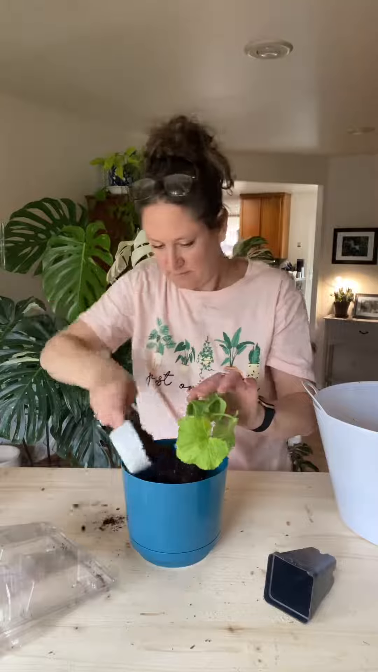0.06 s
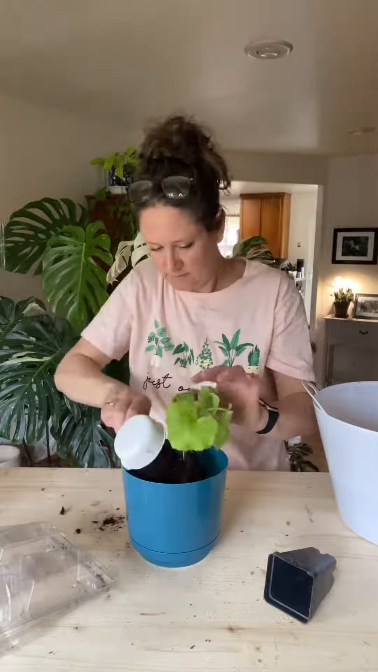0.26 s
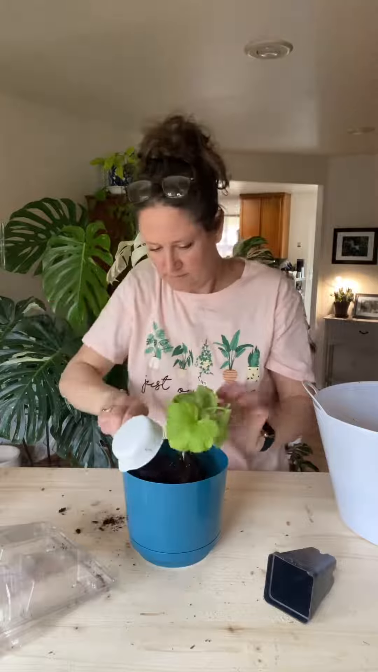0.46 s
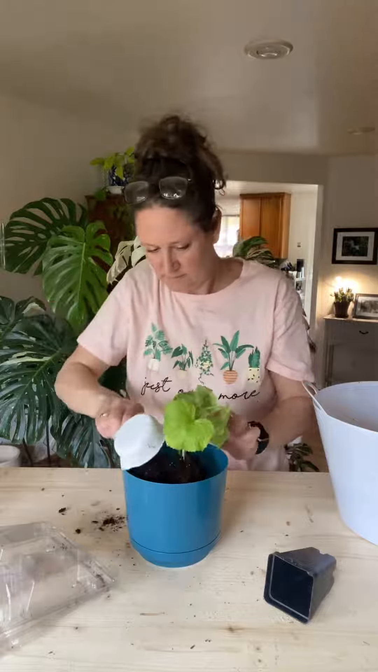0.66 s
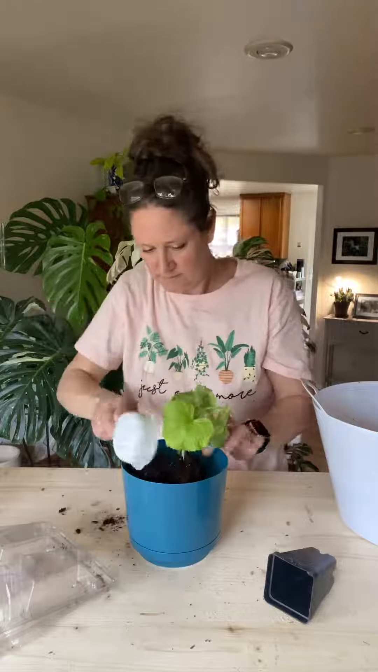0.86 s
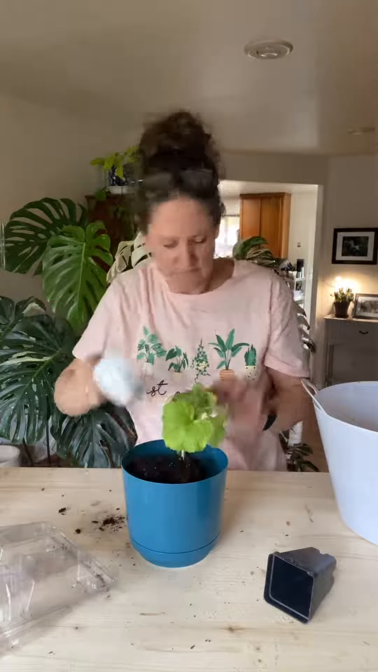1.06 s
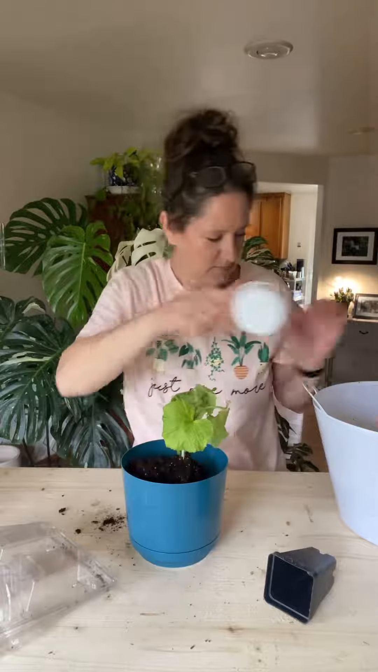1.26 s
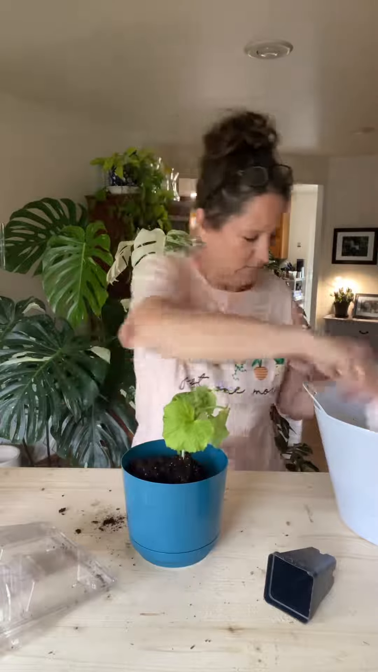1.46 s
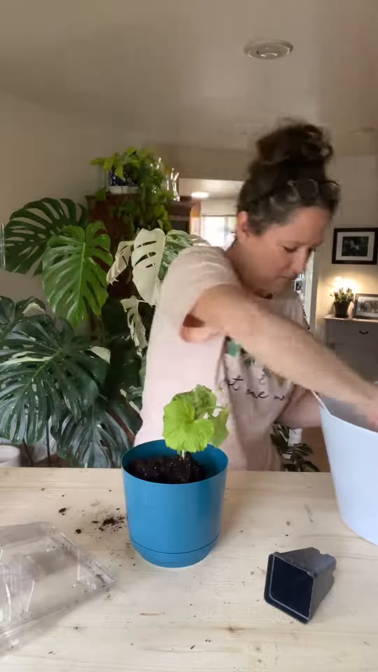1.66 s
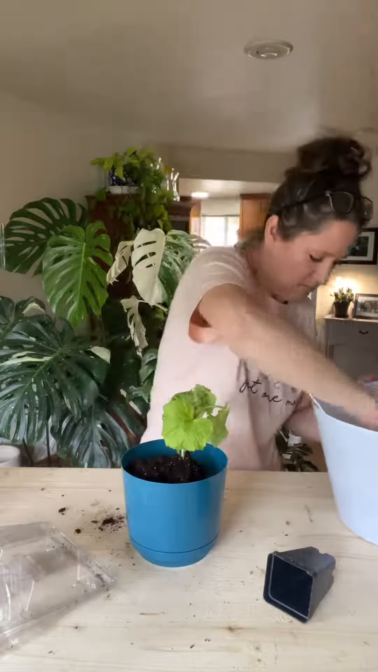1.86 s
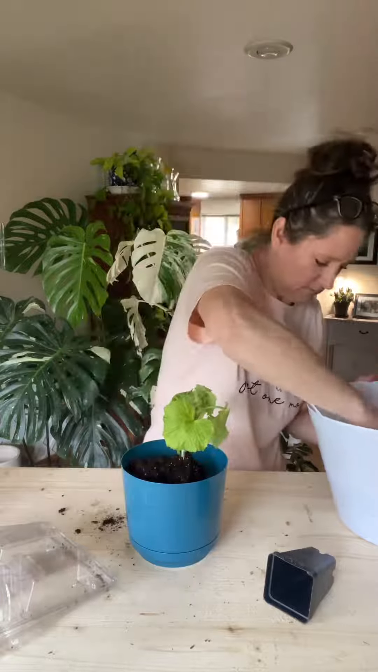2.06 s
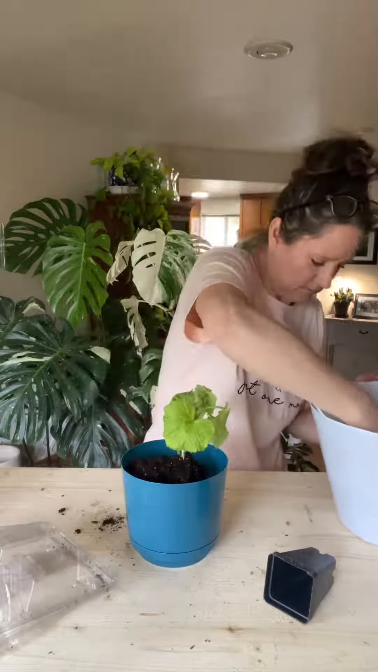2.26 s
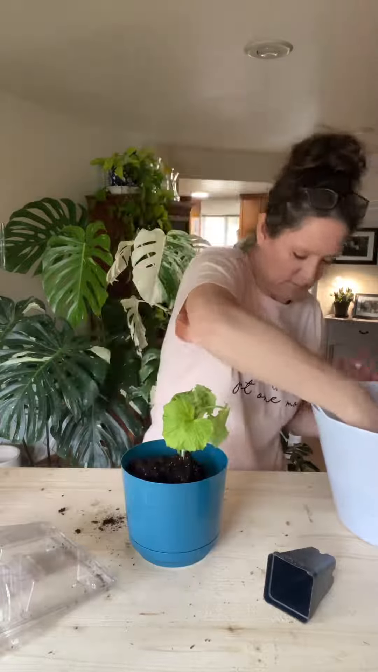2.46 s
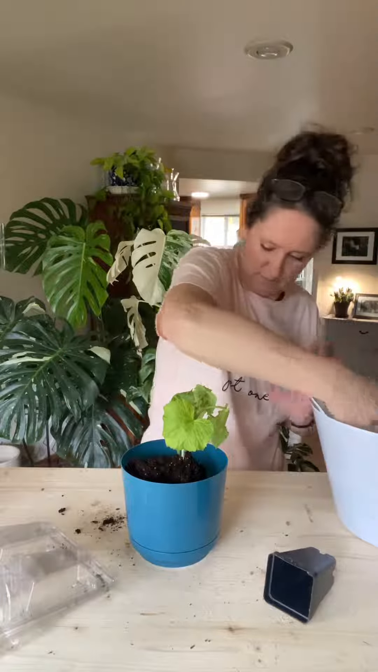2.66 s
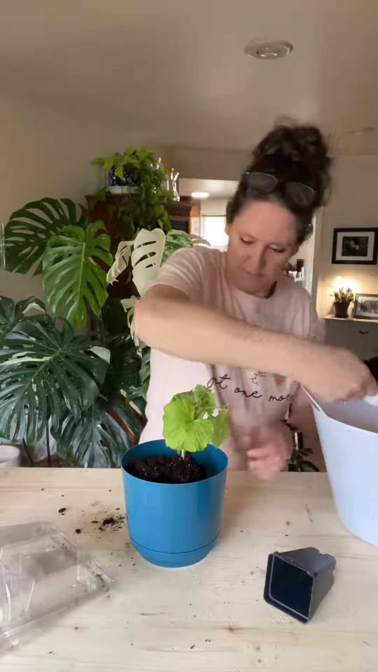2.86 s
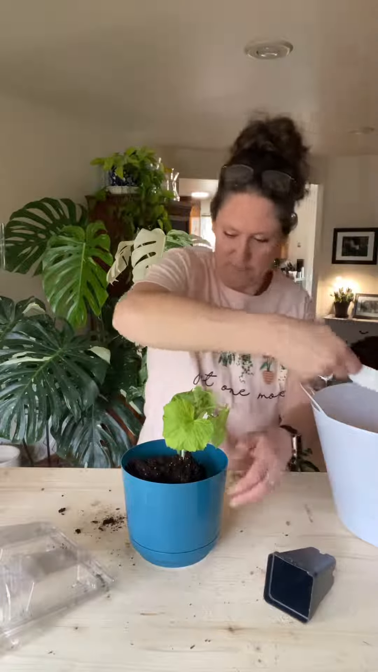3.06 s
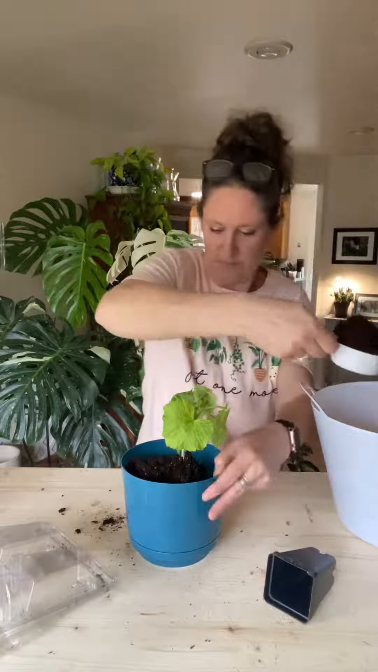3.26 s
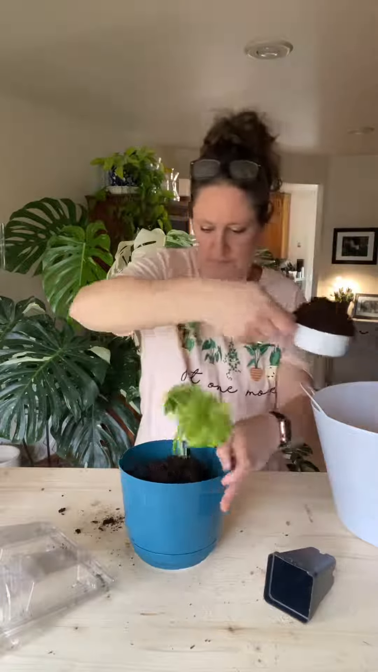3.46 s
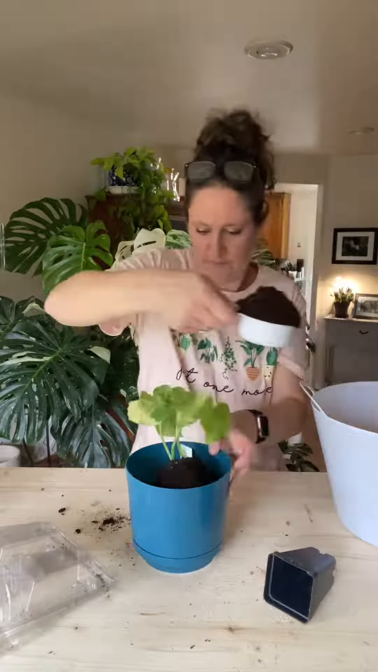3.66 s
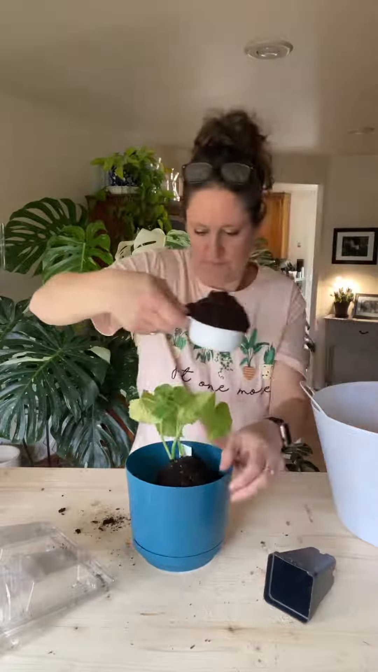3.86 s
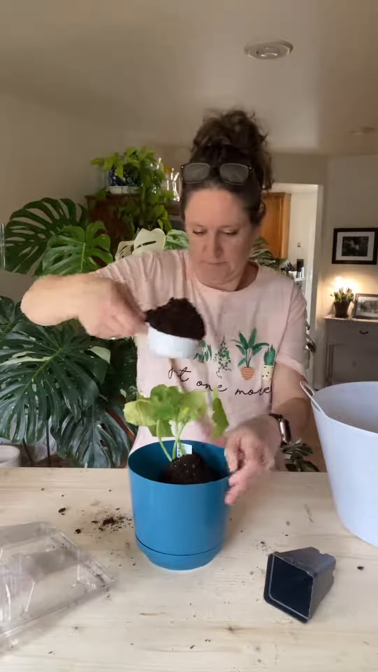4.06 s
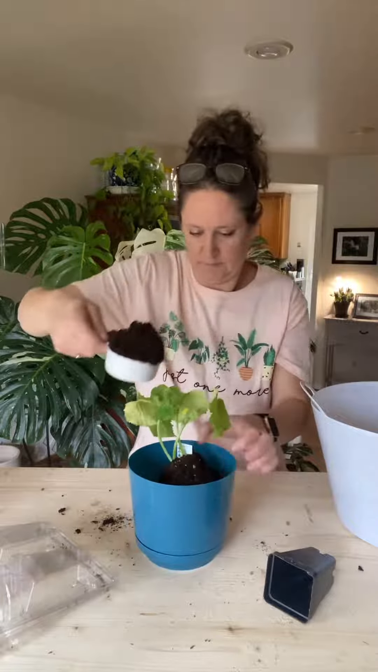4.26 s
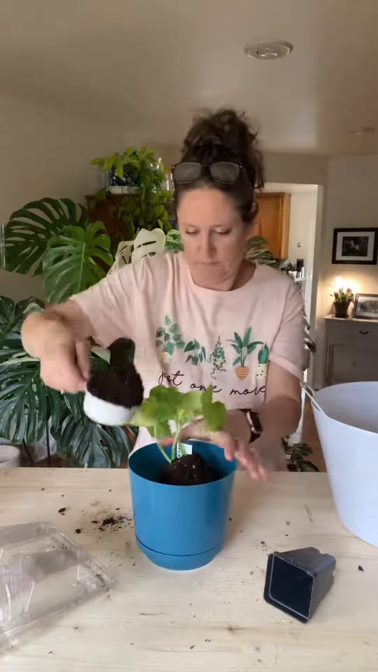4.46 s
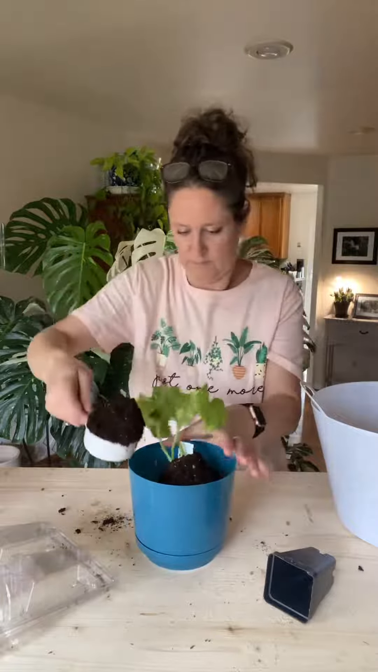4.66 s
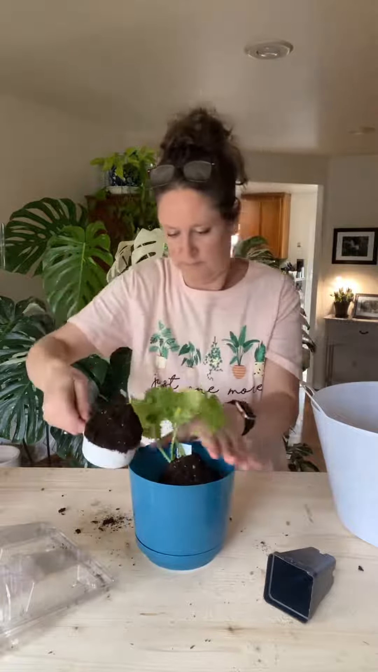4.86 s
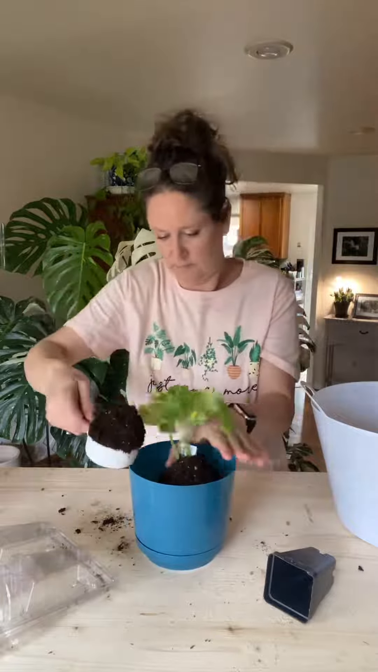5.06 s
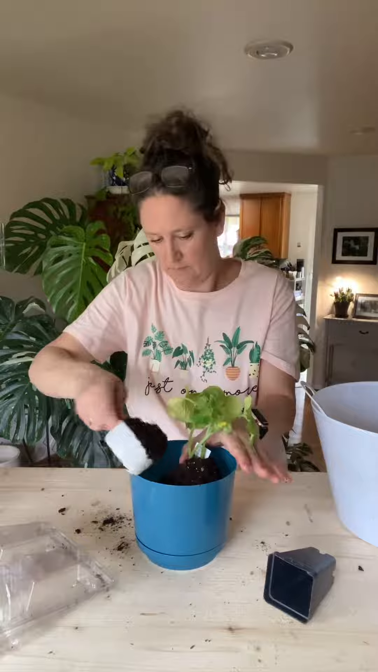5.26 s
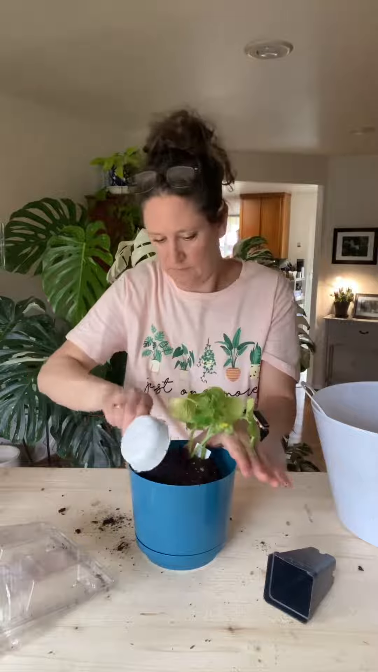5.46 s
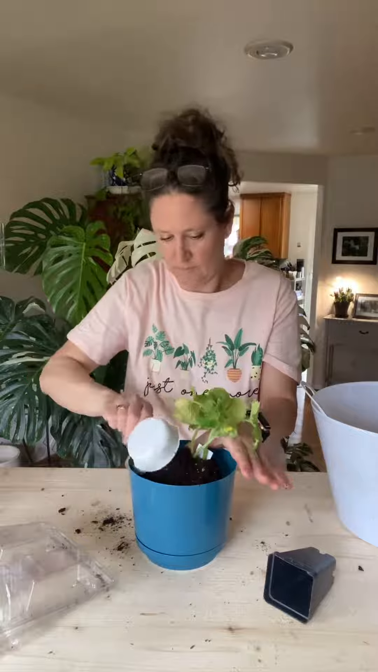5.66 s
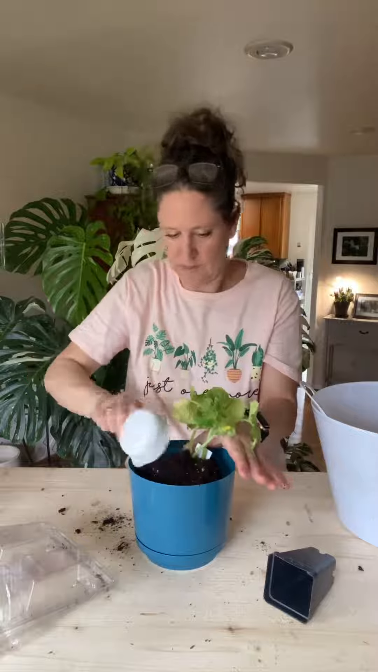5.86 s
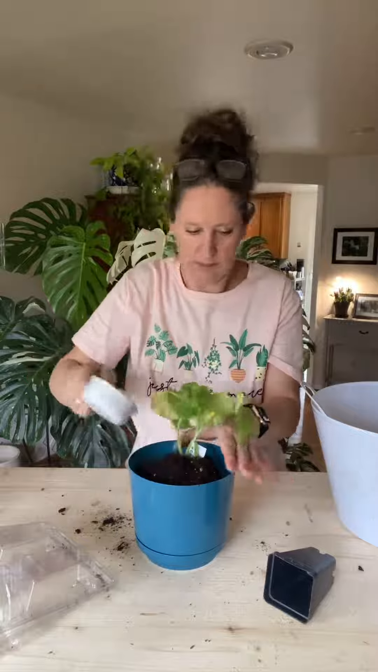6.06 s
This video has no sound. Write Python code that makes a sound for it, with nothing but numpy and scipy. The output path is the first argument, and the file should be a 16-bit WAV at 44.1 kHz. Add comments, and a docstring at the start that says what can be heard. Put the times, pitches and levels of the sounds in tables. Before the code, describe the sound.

Close plastic knocks and soft soil patter, a loud gritty scoop from a tub, then quieter scraping, tipping and light ticks indoors

```python
"""Potting soil scooped by cup

Close up, a small plastic cup digs into a tub of potting soil on a wooden table and tips it into a plastic pot.
Crumbs rub and patter as clusters of tiny random impacts; knocks on cup and rims are short bursts that ring
plastic resonances; each leaves a noise wash, the room's answer, and the table booms in low noise.
Behind them, in a quiet living room, lie a low appliance rumble and a faint hiss, both shaped noise."""
import sys
import numpy as np
from scipy import signal
from scipy.fft import rfft, irfft, next_fast_len
from scipy.io import wavfile
from scipy.ndimage import uniform_filter1d, map_coordinates

SR = 44100
rng = np.random.default_rng(int(sys.argv[2]) if len(sys.argv) > 2 else 0)


def wav_out(sig):
    """Save sig, one row per channel (or a flat mono array), as 16-bit PCM at SR to the path in sys.argv[1]."""
    wavfile.write(sys.argv[1], SR, np.round(np.clip(np.atleast_2d(sig).T, -1, 1) * 32767).astype(np.int16))


N = 269208


def soil():
    """Rubbing crumbs sound in the cup, scrape the tub, shake the walls and hiss; clumps break unevenly."""
    # soil sliding off the cup and falling free:
    # (start [s], rise [s], length [s], grit level [dB], sag [dB/s], dust re grit [dB])
    pours = [(.028, .012, 0.19, -37, 59, -8.5), (.22, .03, 0.19, -46, 25, -4.5),
             (.46, 0.038, 0.13, -46.5, 27, -9.5), (.57, 0.0089, 0.131, -53, 20, -10),
             (1.08, 0.0086, 0.16, -68.5, -14, 2.5), (3.64, 0.037, .17, -53, 47, 4.5),
             (4.06, 0.025, 0.082, -56.5, 36, 0), (4.79, 0.017, 0.19, -61, 7, -4.5),
             (4.92, 0.015, 0.21, -58, 22, -12), (5.04, 0.04, 0.22, -44.5, 78, -6.5),
             (5.55, 0.12, .35, -45.5, 59, -4), (6.0, 0.06, 0.24, -58.5, 11, -5)]
    # the cup dragged through soil: (start [s], rise [s], length [s], grit level [dB], sag [dB/s],
    # dust re grit [dB], walls re grit [dB], scrape re grit [dB])
    digs = [(.21, 0.011, 0.41, -58, -6.5, -14, 3, -15), (.74, 0.0087, 0.17, -46, 67, -3.5, 5.5, 3.5),
            (1.652, 0.0064, .17, -27.5, 70, -4.5, 3.5, -0.5), (1.8, 0.058, 0.26, -39.5, 20, -4, 8, 4.5),
            (2.07, 0.02, 0.39, -39.5, 35, -9, 0, 3.5), (2.43, .03, 0.13, -46, 26, -13, -8, -5),
            (2.57, 0.028, 0.079, -54, 13, -18.5, 2.5, 3), (2.69, 0.0067, 0.042, -52.5, 14, -16, -8, -6.5),
            (3.39, 0.038, 0.203, -47, -20, -7, -10, -3), (3.57, 0.015, 0.266, -41.5, 30, -6.5, 1.5, -1.5),
            (3.84, 0.0083, 0.11, -44, 77, -21, -3, -15), (3.98, 0.01, 0.25, -44, 40, -11, 1.5, -12.5),
            (4.56, 0.019, 0.071, -58.5, 5, -2.5, -10, -9), (4.63, 0.027, 0.064, -54, 23, -5.5, 3.5, -2),
            (5.36, 0.01, 0.1, -58.5, 41, -4, 17, 1)]
    # grit falling free: (frequency [Hz], relative level [dB])
    free_spectrum = [(710, -57), (1200, -19), (1860, -2), (2320, 6), (3430, 3.5), (6000, -14), (7800, -20),
                     (13200, -120)]
    # grit muffled inside the tub: (frequency [Hz], relative level [dB])
    muffled_spectrum = [(880, -24), (1500, -8), (2260, 1.5), (2760, -6.5), (6000, -23.5), (7800, -47),
                        (13200, -120)]
    # shaken walls: (frequency [Hz], relative level [dB])
    wall_spectrum = [(59, -61), (100, 8.5), (177, -5.5), (390, 3.5), (509, -1), (900, -35.5), (1170, -22),
                     (1980, -120)]
    # scraped tub: (frequency [Hz], relative level [dB])
    scrape_spectrum = [(440, -32), (750, 6), (884, -1), (1170, 3.5), (2000, -7.5), (2600, -6.5),
                       (4400, -120)]
    # hissing dust: (frequency [Hz], relative level [dB])
    dust_spectrum = [(2350, -1.5), (4000, -1), (5060, -1.5), (6650, 0), (10300, -6), (11900, -11.5),
                     (13500, -44)]

    falling, falling_dust = strokes(pours)
    buried, buried_dust, shaking, scraping = strokes(digs)
    free_grit = falling * patchy(crumbs(700, 4.2, 0.03, free_spectrum), depth_db=4)
    muffled_grit = buried * patchy(crumbs(900, 3.2, 0.045, muffled_spectrum), depth_db=4.5)
    walls = shaking * patchy(crumbs(400, 2.4, 0.07, wall_spectrum), depth_db=4.5)
    scrape = scraping * patchy(crumbs(600, 3, 0.05, scrape_spectrum), depth_db=3.5)
    dust_gain = np.hypot(falling_dust, buried_dust)
    dust = dust_gain * patchy(crumbs(2000, 3.5, 0.03, dust_spectrum), depth_db=1.0)
    clumps = amp(1.4 * wobble(25))
    return clumps * (free_grit + muffled_grit + walls + scrape + dust)


def strokes(table):
    """Gain of each layer a stroke drives: rise, sag while the soil moves, quick stop; strokes add in power."""
    rise_db, stop_db_per_s = 13.5, 329  # climb during the rise, fall after the end
    start, rise, length, db, sag, *layers_db = np.transpose(table)[..., None]
    t = np.arange(N) / SR - start
    rising = rise_db * np.minimum(t / np.maximum(rise, .002) - 1, 0)
    sagging = sag * np.clip(t - rise, 0, length)
    stopping = stop_db_per_s * np.maximum(t - length, 0)
    power = amp(2 * (db + rising - sagging - stopping))
    return [np.sqrt((power * amp(2 * re_db)).sum(axis=0)) for re_db in [0, *layers_db]]


def crumbs(rate, spread_db, blur_s, spectrum, count=8):
    """Uneven crumb impacts, rate a second, at several places; nearby surfaces smear each place into two paths."""
    size = np.minimum(rng.exponential(size=N), 3.5)
    struck = rng.random(N) < rate / SR
    hits = struck * amp(spread_db * size) * rng.standard_normal(N)
    places = hits * (rng.integers(count, size=N) == np.arange(count)[:, None])
    t = np.arange(SR // 8) / SR
    smear = amp(-60 * t / blur_s) * rng.standard_normal((2, count, len(t)))
    m = next_fast_len(N + len(t))
    smeared = (rfft(places, m) * rfft(smear, m)).sum(axis=1)
    pair = unit(irfft(smeared, m)[:, :N])
    pair = pair + .6 * rng.standard_normal((2, N))  # steady noise fills the gaps between impacts
    return unit(shaped(pair, spectrum))


def patchy(x, depth_db):
    """Narrow resonances come and go as hands and cup move about."""
    z = signal.stft(x, nperseg=2048)[2]
    field = rng.standard_normal(z.shape)
    field = uniform_filter1d(field, size=3, axis=-2)  # across frequency
    field = uniform_filter1d(field, size=5, axis=-1)  # across time
    return signal.istft(z * amp(depth_db * unit(field)), nperseg=2048)[1][..., :x.shape[-1]]


def wobble(rate):
    """A smooth random curve, rate knots a second."""
    knots = rng.standard_normal(int(N * rate / SR) + 4)
    return map_coordinates(knots, [np.arange(N) * rate / SR])


def hollow_thuds():
    """Knocks on pot and tub ring the low resonances of their hollow walls."""
    # (time [s], level [dB], lowest frequency [Hz], highest frequency [Hz], wash fade by 60 dB [s])
    thuds = [(.035, -19.5, 327, 1750, 0.92), (.135, -27.5, 200, 600, 0.55), (.5675, -12.5, 290, 620, 0.4),
             (.685, -13, 280, 750, 0.46), (1.656, -8.5, 112, 1350, 0.4), (1.729, -16, 90, 476, 0.38),
             (1.873, -12.5, 120, 1360, 0.13), (1.942, -15, 117.6, 1860, 0.23),
             (2.096, -17.5, 550, 1390, 0.31), (2.442, -31.5, 520, 920, 0.58),
             (3.265, -35.5, 400, 860, 0.49), (3.577, -22, 207, 874, 0.79), (3.774, -25.5, 110, 418, 0.3),
             (3.843, -27.5, 700, 1460, .55), (3.978, -29.5, 480, 1030, 0.65), (4.079, -25, 375, 960, 0.45),
             (4.784, -40.5, 494, 1440, 0.23), (5.355, -21.5, 189, 583, 0.51),
             (5.436, -36.5, 243, 724, 0.84)]
    # pot and tub walls: (frequency [Hz], width [Hz], level [dB])
    hollow = [(205.5, 10.5, -6), (311, 17, -0.5), (400, 4.4, -9), (586, 52, -2.5), (788.7, 32, -7.5),
              (1015, 27, -1.5), (1214, 130, -20.5), (1440, 17, -40)]
    return blows(thuds, hollow, push=1.69, rise_s=0.00084, contact_s=0.0028, ring_db=12.5, wash_db=-6)


def cup_ticks():
    """Clods and rims tick on the cup and ring the resonances of its wall."""
    # (time [s], level [dB], pitch [Hz])
    ticks = [(0.0335, -18, 2030), (.1354, -28, 2450), (0.2078, -21, 2590), (0.473, -32, 2280),
             (0.4973, -28, 3300), (0.569, -24, 2460), (0.6844, -17.5, 2010), (.7619, -22, 2420),
             (1.6571, -8, 2330), (2.0714, -25.5, 2270), (2.0976, -15, 1830), (2.1493, -19, 1990),
             (3.269, -29.5, 2740), (3.5808, -21.5, 2610), (3.8464, -30.5, 2220), (3.9813, -28, 2600),
             (4.2243, -43.5, 2900), (5.0796, -27.5, 2400), (5.355, -25.5, 2160), (5.621, -29, 2800),
             (5.6794, -29, 3500), (5.7215, -28, 3056), (5.772, -32, 3240)]
    # the cup: (frequency [Hz], width [Hz], level [dB])
    cup = [(1857, 13, 6), (2094, 6.7, 17), (2355, 62, 1.5), (2480, 6.7, -2), (2902, 13.5, 6),
           (3050, 35, -45), (3280, 20, -27)]
    bands = [(s, db, 0.63 * hz, 1.2 * hz, .2) for s, db, hz in ticks]  # wash fades in .2 s
    return blows(bands, cup, push=0.21, rise_s=.001, contact_s=0.0072, ring_db=-2.0, wash_db=-12.5)


def grain_snaps():
    """Small hard grains snap: bursts of high noise without any ringing wall."""
    # (time [s], level [dB], pitch [Hz])
    snaps = [(0.032, -23.5, 4400), (0.2352, -32.5, 6370), (0.315, -30.5, 6850), (0.7623, -26, 5300),
             (0.8805, -29.5, 5800), (1.088, -46.5, 5100), (1.171, -49, 4690), (1.654, -16, 5260),
             (2.021, -26.5, 6940), (3.267, -44.5, 5840), (3.9803, -30.5, 5220), (4.7865, -38, 4860),
             (5.135, -44, 4160), (5.3347, -39, 4260), (5.5653, -42, 9140), (5.8182, -36, 10300)]
    bands = [(s, db, 1.39 * hz, 0.96 * hz, .2) for s, db, hz in snaps]  # wash fades in .2 s
    return blows(bands, (), push=0, rise_s=0.0013, contact_s=0.017, ring_db=0, wash_db=-10.5)


def blows(table, modes, push, rise_s, contact_s, ring_db, wash_db):
    """Each blow rings the modes in its band; rattling crumbs and the room draw it out into a fading wash."""
    out = np.zeros((2, N + SR))
    t = np.arange(SR // 2) / SR
    rise = 1 - np.exp(-t / max(rise_s, 1e-5))
    for s, db, low_hz, high_hz, t60 in table:
        noise = rng.standard_normal((3, len(t)))
        blow = amp(-60 * t / contact_s) * (push + noise[2]) * [[1], [.7]]  # weaker in the second path
        wash = amp(wash_db - 60 * t / np.clip(t60, .02, 2)) * rise * noise[:2]
        sound = filtered(blow + wash,
                         lambda f: band(low_hz, high_hz, f) * (1 + amp(ring_db) * ringing(modes, f)))
        at = round(s * SR)
        out[:, at:at + len(t)] += amp(db) * sound / abs(sound[0]).max()
    return out[:, :N]


def ringing(modes, hz):
    """Causal response of a set of (Hz, width, dB) resonances with alternating signs."""
    return sum((-1) ** k * amp(db) * 1j * hz * w / (c * c - hz * hz + 1j * hz * w)
               for k, (c, w, db) in enumerate(modes))


def band(low_hz, high_hz, f):
    """Causal band with steep skirts."""
    turn = lambda u: 1 / (1 - u * u + 1.1j * u)
    return turn(f / high_hz) ** 2 * (f / low_hz) ** 2 * turn(f / low_hz)


def table_rumble():
    """Low appliance rumble, shaped noise with evened level, that swells when the table is pushed."""
    # rumble: (frequency [Hz], relative level [dB])
    rumble_spectrum = [(13, -1), (22, -8), (30, -38), (43, 11), (60, 10), (92, -14), (108, -13.5),
                       (130, -13.5), (170, -28), (290, -120)]
    # the table booms under a heavy push: (time [s], level [dB])
    booms = [(.57, -33.5), (.7, -44), (1.655, -21), (1.9, -23.5), (2.3, -37), (3.76, -33.5), (5.37, -35)]
    rumble_db = -45  # steady level
    rise_s, hold_s, t60_s = 0.016, 0.027, 1  # course of each boom

    noise = unit(shaped(rng.standard_normal((2, N)), rumble_spectrum))
    power = uniform_filter1d(noise ** 2, SR // 10)
    evened = noise / np.sqrt(abs(power) + 0.033)  # steadier than free noise
    s, db = np.transpose(booms)[..., None]
    t = np.arange(N) / SR - s
    fading = 60 * np.maximum(t - rise_s - hold_s, 0) / t60_s
    pushes = np.clip(t / rise_s, 0, 1) * amp(db - fading)
    return np.sqrt(amp(2 * rumble_db) + (pushes ** 2).sum(axis=0)) * unit(evened)


def air_hiss():
    """Steady faint hiss of the room: noise through a fixed spectrum."""
    # (frequency [Hz], relative level [dB])
    air_spectrum = [(59, -23), (100, 1), (205, -9.5), (561, -19.5), (647, -21.5), (717, -23.5),
                    (1470, -26.5), (6860, -31), (13500, -38)]
    return amp(-55.5) * unit(shaped(rng.standard_normal((2, N)), air_spectrum))


def spread(paths, wide):
    """Shared and opposed parts of a close microphone pair; the opposed part is a quarter cycle ahead."""
    side = filtered(paths[1], lambda hz: 1j * amp(along(wide, hz)))
    return np.array([paths[0] + side, paths[0] - side])


def amp(db):
    """dB to gain."""
    return 10 ** (np.asarray(db) / 20)


def unit(x):
    """Scaled to rms 1."""
    return x / np.sqrt(np.mean(x ** 2) + 1e-20)


def along(points, hz):
    """(Hz, value) points on a log axis."""
    f, v = np.transpose(points)
    return np.interp(np.log(hz + 1), np.log(f + 1), v)


def filtered(x, response):
    """x times a complex response of frequency."""
    n = x.shape[-1]
    m = next_fast_len(n + 8192)
    return irfft(rfft(x, m) * response(np.fft.rfftfreq(m, 1 / SR)), m)[..., :n]


def shaped(x, spectrum):
    """x weighted by a spectrum of (Hz, dB) points."""
    return filtered(x, lambda hz: amp(along(spectrum, hz)))


def scene():
    """Soil, ticks, snaps and thuds close to the microphones, the room around."""
    # soil and knocks: (frequency [Hz], opposed part re shared part [dB])
    near_wide = [(60, -57), (130, -10.5), (290, -11), (630, -1), (1390, -1), (3040, 0.5), (6660, -2),
                 (14600, -0.5)]
    # background: (frequency [Hz], opposed part re shared part [dB])
    room_wide = [(60, -25.5), (150, -6), (370, 3.5), (940, 8.5), (2340, 4), (5840, -3.5), (14600, -3)]
    near = soil() + cup_ticks() + grain_snaps() + hollow_thuds()
    room = table_rumble() + air_hiss()
    pair = spread(near, near_wide) + spread(room, room_wide)
    return pair * amp([[-.3], [.3]])  # slightly to the right


def record(dry):
    """The deepest bass is rolled off; the sound ends at 13.1 kHz."""
    top_hz, bass_hz = 13100, 34
    return filtered(dry, lambda hz: (hz < top_hz) * (1j * hz / (bass_hz + 1j * hz)) ** 3)


dry = scene()
out = record(dry)
wav_out(out)
```